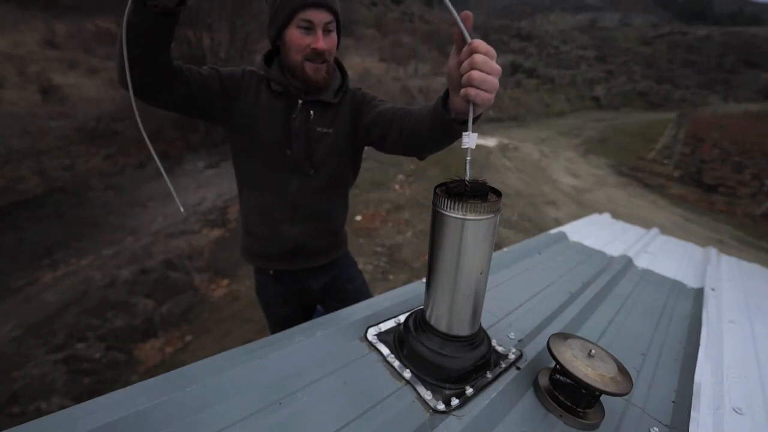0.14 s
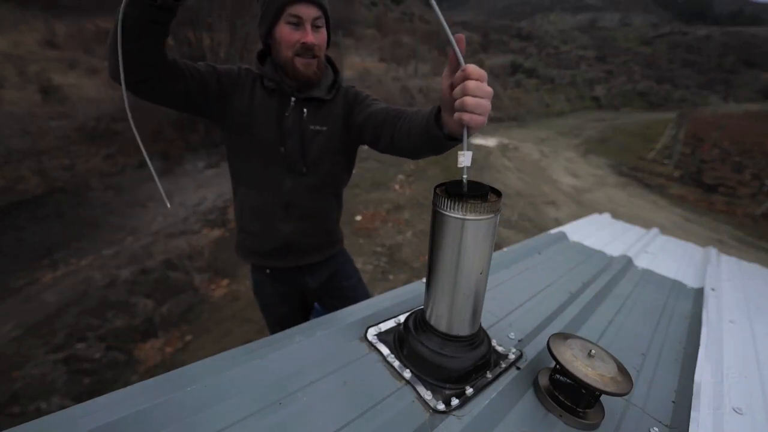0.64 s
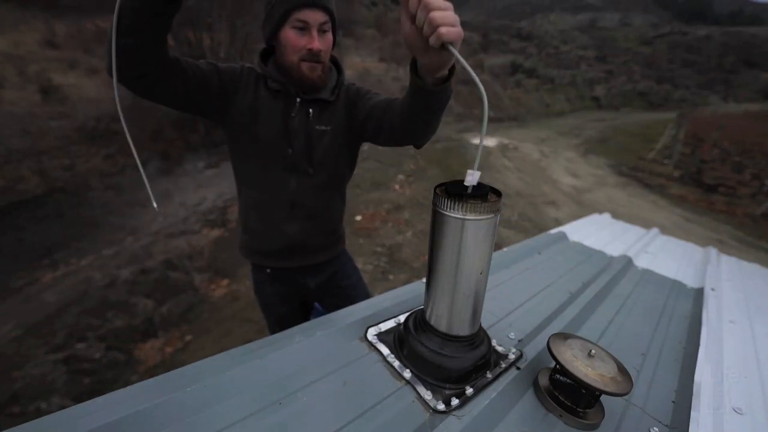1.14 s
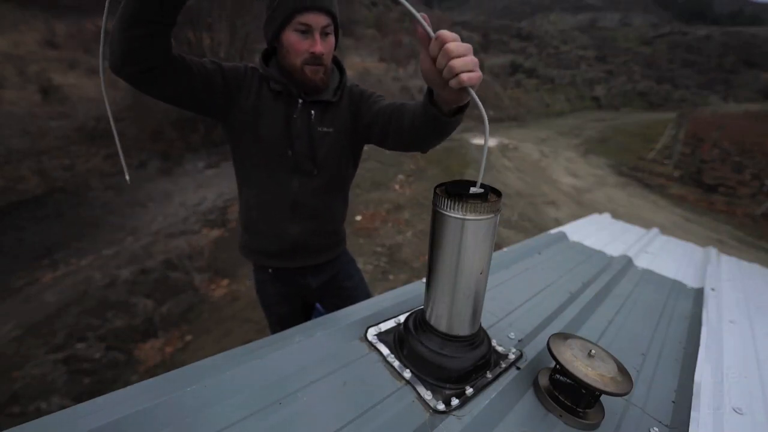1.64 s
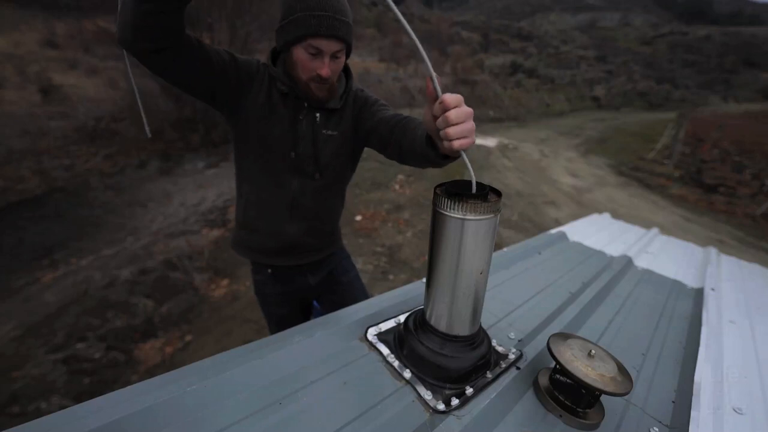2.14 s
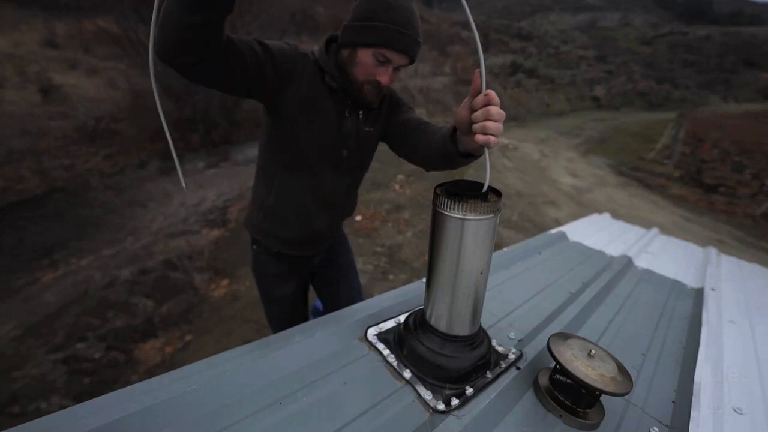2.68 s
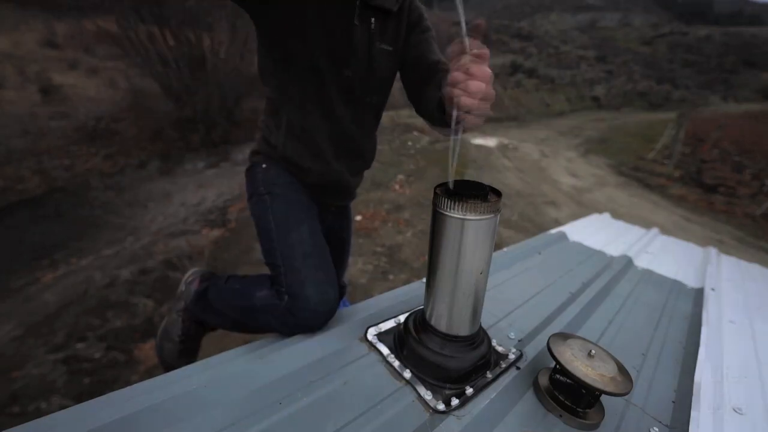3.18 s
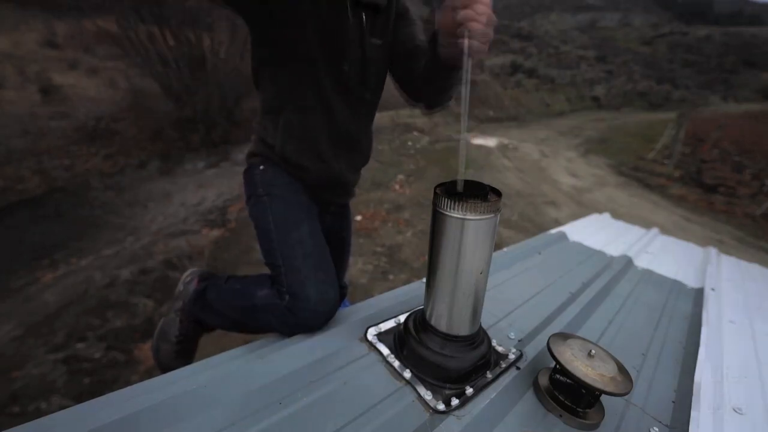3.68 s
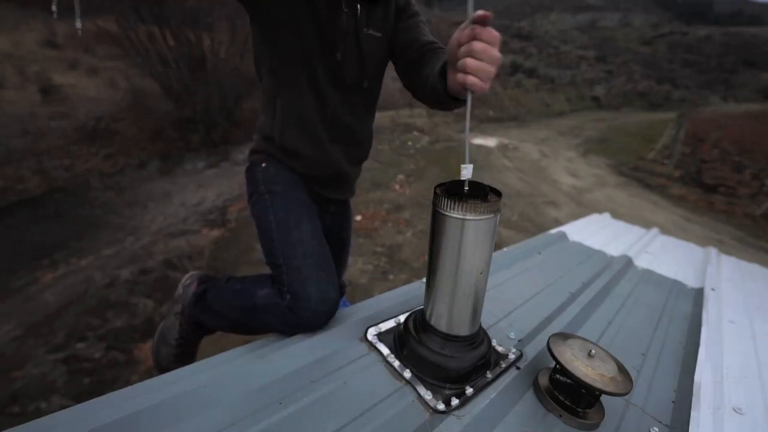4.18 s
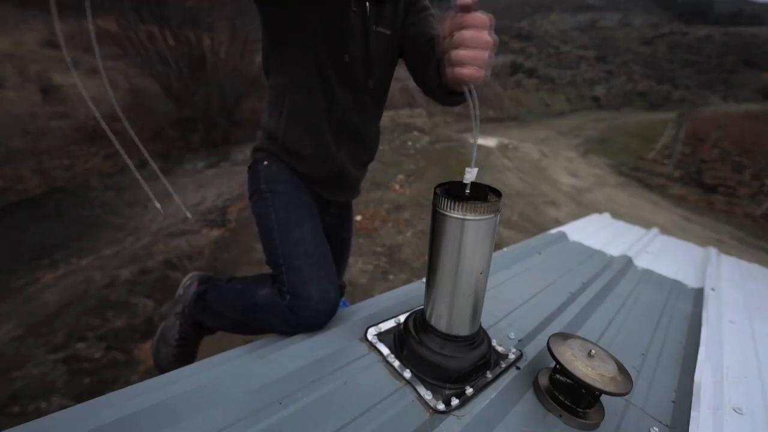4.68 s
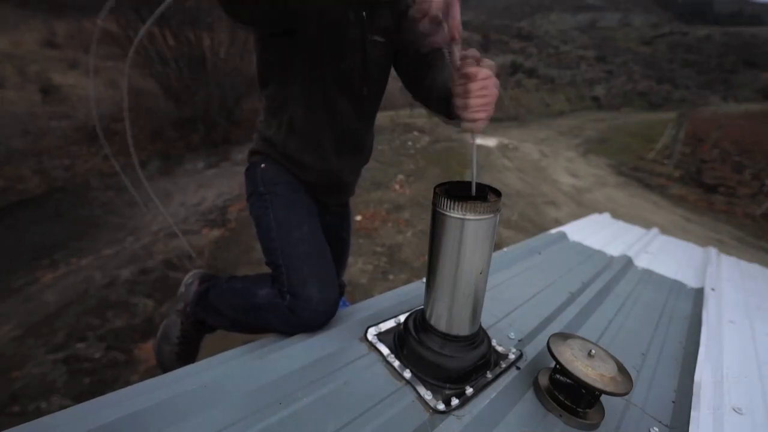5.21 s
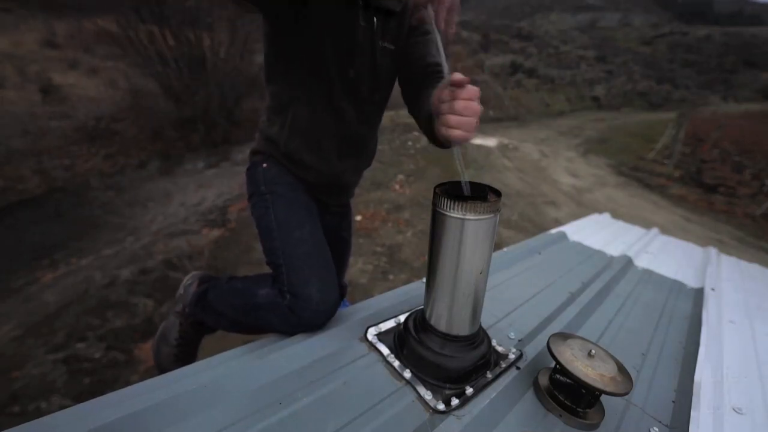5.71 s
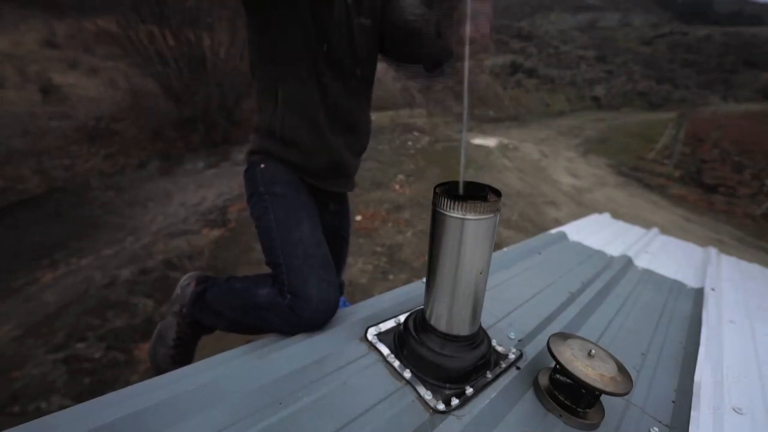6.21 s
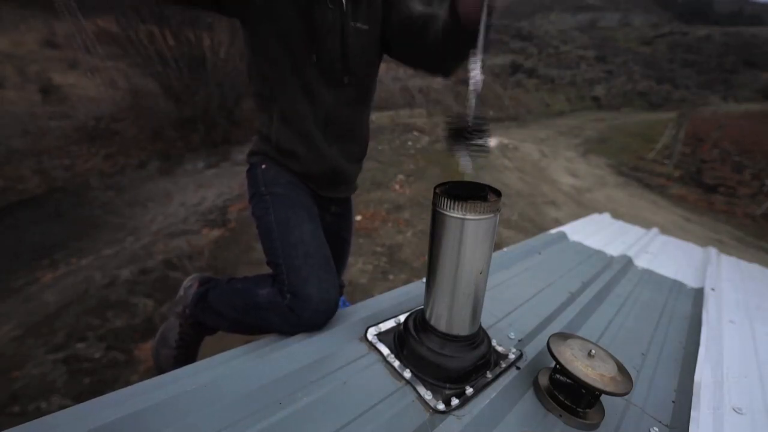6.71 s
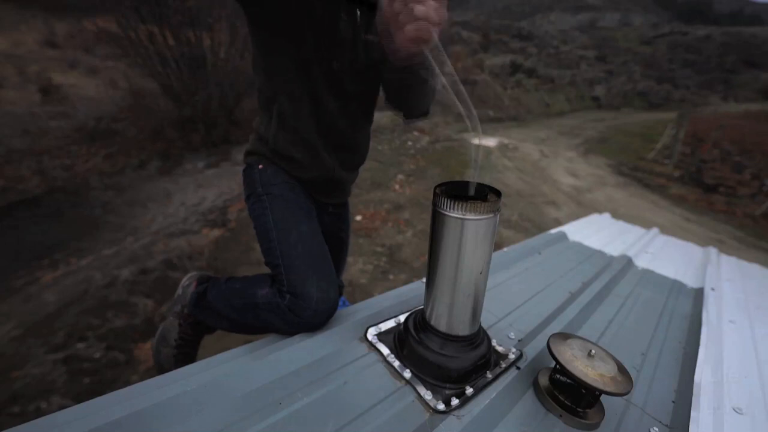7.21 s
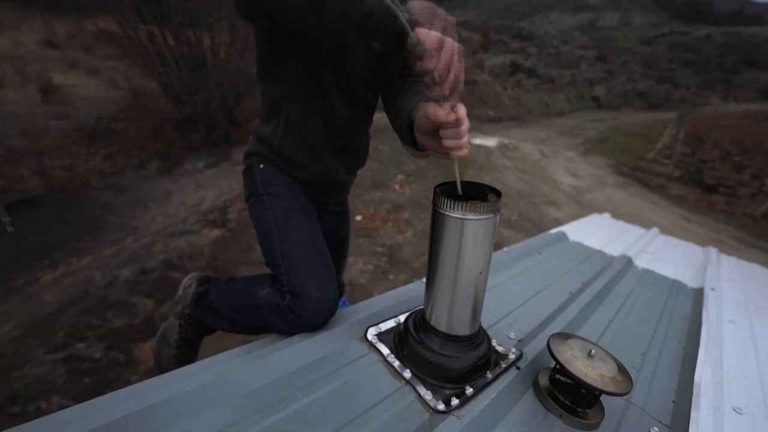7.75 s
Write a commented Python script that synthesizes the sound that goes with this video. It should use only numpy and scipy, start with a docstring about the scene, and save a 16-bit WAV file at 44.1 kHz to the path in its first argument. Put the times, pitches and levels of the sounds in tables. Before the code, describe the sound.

Raspy metallic brush strokes rasp in a hollow sheet-metal flue, broken by sharp clinks and creaky roof knocks, with faint wind outdoors.

```python
"""A wire brush on a flexible rod scrubs up and down in a sheet-metal stove pipe on a steel roof, near one microphone.
Stick-slip of the bristles makes dense tiny clicks that hiss out of the pipe mouth and ring the wall as resonances.
The rod and bristles tick on the rim, each tick a crack of noise with a short ping of close tones.
A knee knocks, creaks and squeaks on the roof sheet, as noise through resonances; a smooth rustle swells once.
Low coloured noise is wind buffeting the microphone, over a far outdoor noise."""
import sys
import numpy as np
from scipy import signal
from scipy.fft import rfft, irfft, next_fast_len
from scipy.io import wavfile
from scipy.ndimage import uniform_filter1d, map_coordinates

SR = 44100
rng = np.random.default_rng(int(sys.argv[2]) if len(sys.argv) > 2 else 0)


def unload_wav(signal):
    """Save mono or channel-first audio to the path in sys.argv[1] as 16-bit WAV at rate SR, clipped to [-1, 1]."""
    wavfile.write(
        sys.argv[1],
        SR,
        np.round(np.clip(np.atleast_2d(signal).T, -1, 1) * 32767).astype(np.int16),
    )


def volts(x):
    """Linear amplitude factor 10**(x/20) for a level x in dB, scalar or array-like."""
    e = np.asarray(x, float) / 20
    return 10 ** e


N = 346626  # length [samples]

# wind on the microphone: (time [s], buffet level [dB])
WIND_LEVEL = [(0.0, -44.5), (0.85, -35), (0.9, -43.5), (3.83, -49), (3.92, -26.5), (4.12, -40), (6.04, -41),
              (6.08, -27), (6.6, -49.5), (6.63, -33), (6.89, -36), (6.98, -47), (7.07, -35), (7.46, -26.5),
              (7.53, -31), (7.6, -19.5), (7.86, -46)]
# spectrum of the buffet: (frequency [Hz], relative level per hertz [dB])
BUFFET_COLOUR = [(15, -7), (33, 0), (43, 0.5), (60, -20), (110, -41), (200, -71)]
# spectrum of the far outdoor noise: (frequency [Hz], relative level per hertz [dB])
FAR_COLOUR = [(40, -33), (75, 7.5), (130, -10), (300, -14), (900, -12), (1700, -16), (2600, -28),
              (8600, -35), (9600, -37), (15600, -47)]
FAR_DB = -51.5  # rms level of the far noise

# a soft, smooth rustle, perhaps a sleeve: (time [s], level [dB])
RUSTLE_LEVEL = [(3.25, -58), (3.3, -48.5), (3.85, -73.5)]

# knee knocks on the roof sheet: (time [s], crack strength [dB], thud strength [dB])
KNEE_KNOCKS = [(3.602, -43, -61), (3.672, -31.5, -48), (3.769, -33, -49), (3.856, -19.5, -38),
               (3.867, -21, -38), (3.898, -18.5, -42), (3.964, -33, -43.5), (4.111, -28.5, -50),
               (4.172, -24, -68), (4.208, -20.5, -50)]
# roof sheet resonances: (frequency [Hz], width [Hz], relative level [dB])
ROOF_MODES = [(132, 41, 10.5), (466, 77, 2), (790, 220, -3), (1106, 320, -4), (1780, 320, -3.5),
              (3140, 1400, -11)]
# creaking of the roof sheet under the shifting knee: (time [s], strength [dB])
CREAK_STRENGTH = [(3.66, -51), (3.69, -46.5), (3.76, -54), (3.86, -38), (4.0, -46), (4.22, -43), (4.3, -55)]
# one squeak of the roof sheet: (start [s], end [s], frequency [Hz], resonance width [Hz], highest level [dB])
ROOF_SQUEAK = (3.775, 3.853, 1880, 170, -39)

# rod and bristle ticks on the rim: (time [s], strength [dB], ping frequency [Hz])
RIM_TICKS = [(1.546, -48.5, 3150), (2.4337, -49, 4840), (2.7492, -34, 1630), (3.174, -36.5, 5060),
             (3.537, -32.5, 4950), (3.538, -44, 1670), (5.7258, -31, 8600), (5.7948, -10, 7850),
             (6.0205, -25, 7200), (6.2982, -9, 7320), (6.7647, -9.5, 8300), (7.0468, -29.5, 2930),
             (7.1987, -14.5, 7830), (7.203, -24.5, 561)]

# full brush strokes, all equally loud: (full from [s], held [s], rise [s per 40 dB], fall [s per 40 dB],
# spring-back level [dB])
FULL_STROKES = [(0.164, 0.035, 0.122, 0.09, -56), (0.35, 0.045, 0.14, 0.063, -48),
                (0.656, 0.097, 0.045, 0.054, -46), (1.192, 0.073, 0.06, 0.045, -48),
                (1.783, 0.121, 0.131, 0.088, -43), (2.097, 0.098, 0.04, 0.059, -44),
                (4.595, 0.093, 0.08, 0.057, -41), (4.853, 0.118, 0.035, 0.053, -42),
                (5.329, 0.121, 0.02, 0.077, -56), (5.794, 0.143, 0.025, 0.131, -42),
                (6.298, 0.21, 0.018, 0.13, -56), (6.766, 0.089, 0.004, 0.073, -52),
                (7.495, 0.095, 0.008, 0.045, -70), (7.77, 0.1, 0.08, 0.1, -70)]
FULL_DB = -14.5  # scrape level of every full stroke
# bristles spring back after a stroke: delay and hold [s], rise and fall [s per 40 dB]
SPRING_S, SPRING_HELD_S, SPRING_RISE_S, SPRING_FALL_S = 0.094, 0.013, 0.055, 0.081
# the bristles catch on the wall abruptly: (full from [s], held [s], level [dB])
WALL_CATCHES = [(0.001, 0.017, -28), (0.058, 0.027, -34.5), (0.556, 0.039, -40), (1.152, 0.17, -23.5),
                (1.314, 0.027, -42.5), (1.702, 0.018, -25), (2.454, 0.0092, -54.5), (2.736, 0.012, -33),
                (2.799, 0.008, -38.5), (3.023, 0.052, -45.5), (3.116, 0.0085, -50.5), (3.966, 0.0044, -55),
                (4.029, 0.036, -42), (4.112, 0.0044, -51.5), (4.429, 0.041, -31.5), (4.551, 0.045, -21.5),
                (6.264, 0.033, -36.5), (6.562, 0.012, -24), (6.744, 0.021, -39.5), (6.972, 0.0051, -25.5),
                (7.201, 0.013, -26), (7.283, 0.017, -36.5), (7.334, 0.011, -15), (7.384, 0.022, -18),
                (7.419, 0.037, -29), (7.4607, 0.005, -19.5), (7.713, 0.05, -22.5)]
CATCH_RISE_S, CATCH_FALL_S = 0.008, 0.05  # [s per 40 dB]
# light drags that swell and fade: (full from [s], held [s], level [dB], fall [s per 40 dB])
LIGHT_DRAGS = [(0.493, 0.01, -37, .15), (1.07, 0.03, -55, .06), (1.418, 0.031, -29, .06),
               (1.685, 0.01, -43, .05), (2.025, 0.003, -40, .08), (2.89, 0.032, -21, .07),
               (4.007, 0.003, -43, .04), (4.155, 0.003, -36, .27), (4.374, 0.03, -37, .08),
               (5.17, 0.03, -49, .13), (5.26, 0.05, -45, .1), (5.6, 0.1, -54, .1), (6.14, 0.08, -53, .06),
               (7.123, .01, -46, .1), (6.68, 0.03, -53, .05), (7.039, 0.009, -34, .05),
               (7.36, 0.02, -26, .06)]
DRAG_RISE_S = 0.12  # [s per 40 dB]
RESTING_DB, STIR_DB = -70, 4  # scrape level between contacts, and the size of its random stirring

# spectrum of the bristle hiss leaving the pipe mouth: (frequency [Hz], relative level per hertz [dB])
MOUTH_COLOUR = [(1500, -21), (3300, -15), (4300, -11.5), (5000, -6), (6100, -9), (7100, -2), (8600, -3),
                (10300, -14), (12800, -5.5), (14500, -14), (15600, -15)]
# pipe wall modes: (frequency [Hz], width and splitting [Hz], relative level [dB])
WALL_MODES = [(260, 38.7, -4), (401.7, 8.1, -7), (534, 9, 4.5), (677.4, 20.6, -4.5), (790.6, 12.6, -0.5),
              (1085, 18.4, 1), (1229, 25, -4.5), (2720, 9, 0.5), (2793, 14.7, 2), (2906, 16, -1.5),
              (2938, 13.3, -3), (3016, 15, -1.5), (4780, 40, -2)]
# broad drone of the pipe between its modes: (frequency [Hz], relative level per hertz [dB])
DRONE_COLOUR = [(80, -12), (140, -3), (300, 2), (420, -8.5), (1200, -4.5), (2300, -7.5), (4500, -21)]
# coupling of the strokes to wall and drone as the brush changes depth: (time [s], relative level [dB])
DEPTH_COUPLING = [(0, -20), (1.3, -24), (2.9, -20), (4.4, -22), (5.9, -23), (7.9, -23.5)]

TOP_HZ = 15750  # upper band limit


def unit(x):
    """Normalisation: scales a signal to rms 1."""
    return x / np.sqrt(np.mean(x ** 2) + 1e-20)


def filtered(x, response):
    """Convolution theorem: multiplies the spectrum of x by a response of frequency."""
    m = next_fast_len(N + SR // 2)
    return irfft(rfft(x, m) * response(np.fft.rfftfreq(m, 1 / SR)), m)[..., :N]


def colour(points):
    """Spectral shaping: a gain interpolated in dB over log frequency."""
    f, level = np.transpose(points)
    return lambda hz: volts(np.interp(np.log(hz + 1), np.log(f), level))


def modes(table):
    """Modal superposition: a sum of damped resonances of alternating sign."""
    def response(f):
        total = 0
        for k, (centre, width, db) in enumerate(table):
            resonance = 1j * f * width / (centre * centre - f * f + 1j * f * width)
            total = total + (-1) ** k * volts(db) * resonance
        return total
    return response


def curve(rows):
    """Amplitude envelope: a gain linear in dB between (time, level) rows, -120 dB outside them."""
    s, db = np.transpose(rows)
    return volts(np.interp(np.arange(N) / SR, s, db, left=-120, right=-120))


def wobble(rate):
    """Band-limited fluctuation: a smooth random curve through rate knots a second."""
    knots = rng.standard_normal(int(N * rate / SR) + 4)
    return map_coordinates(knots, [np.arange(N) * rate / SR])


def slips(rate, spread_db):
    """Stick-slip friction: random clicks, rate a second, a few larger than the rest, at rms 1."""
    happens = rng.random(N) < rate / SR
    size = volts(spread_db * rng.exponential(size=N))
    return unit(happens * rng.standard_normal(N) * size)


def bursts(times, levels_db, t60):
    """Impact with exponential decay: noise starts sharply and falls 60 dB in t60 seconds."""
    out, t = np.zeros(N + SR), np.arange(SR // 4) / SR
    for s, db in zip(times, levels_db):
        out[round(s * SR):][:len(t)] += volts(db - 60 * t / t60) * rng.standard_normal(len(t))
    return out[:N]


def air():
    """Turbulent pressure: low coloured noise buffets the microphone, over a gently swelling far noise."""
    buffet = unit(filtered(rng.standard_normal(N), colour(BUFFET_COLOUR)))
    far = unit(volts(1.5 * wobble(5)) * filtered(rng.standard_normal(N), colour(FAR_COLOUR)))
    return curve(WIND_LEVEL) * buffet + volts(FAR_DB) * far


def rustle():
    """Broadband friction: a smooth bright hiss swells and fades once."""
    bright = colour([(1500, -2.5), (4000, -6.5), (8600, -5.5), (9600, -12), (15600, -20)])
    return curve(RUSTLE_LEVEL) * unit(filtered(rng.standard_normal(N), bright))


def knee():
    """Forced plate vibration: knocks crack and softly boom, rough slips creak and one resonance squeaks."""
    s, db, thud_db = np.transpose(KNEE_KNOCKS)
    creak = curve(CREAK_STRENGTH) * slips(5000, spread_db=2.0)
    sharp_force = volts(12) * bursts(s, db, t60=0.037) + volts(16.5) * creak
    upper_roof = modes(ROOF_MODES[1:])
    crack = filtered(sharp_force, lambda f: upper_roof(f) / (1 + 1j * f / 5000))  # softened above 5 kHz
    boom = filtered(volts(25.5) * bursts(s, thud_db, t60=0.09), modes(ROOF_MODES[:2]))
    start, end, hz, width, squeak_db = ROOF_SQUEAK
    resonance = modes([(hz, width, 0)])
    squeak = unit(filtered(rng.standard_normal(N), lambda f: resonance(f) ** 2))
    swell = curve([(start, squeak_db - 5), (end - 0.02, squeak_db), (end, squeak_db - 4)])
    return crack + boom + swell * squeak


def ticks():
    """Impulsive excitation: a crack of noise, and a beating, quickly decaying ping of eight close tones."""
    s, db, hz = np.transpose(RIM_TICKS)
    pings, t = np.zeros(N + SR), np.arange(SR // 8) / SR
    detunings = rng.normal(1, 0.04, (len(s), 8, 1))
    for start, level_db, pitch_hz, detune in zip(s, db, hz, detunings):
        t60 = 0.035 + 70 / pitch_hz  # low pings last longer
        decay = volts(0.81 * level_db - 23 - 60 * t / t60)
        tones = np.sin(2 * np.pi * pitch_hz * detune * t).sum(0)
        pings[round(start * SR):][:len(t)] += decay * tones
    return bursts(s, 0.95 * db, t60=0.026), pings[:N]


def contact(s, held, db, rise, fall):
    """Energy addition: summed power of contacts that rise, hold and fall, one value every 16 samples."""
    s, held, db, rise, fall = (np.reshape(v, (-1, 1)) for v in (s, held, db, rise, fall))
    t = np.arange(0, N, 16) / SR
    before = np.maximum((s - t) / np.abs(rise), 0)
    after = np.maximum((t - s - held) / np.abs(fall), 0)
    return np.sum(volts(db - 40 * (before + after)) ** 2, axis=0)


def stroke_db():
    """Incoherent addition: strokes, spring-back, catches and drags add in power to a scrape level [dB]."""
    s, held, rise, fall, spring_db = np.transpose(FULL_STROKES)
    drag_s, drag_held, drag_db, drag_fall = np.transpose(LIGHT_DRAGS)
    spring_s = s + held + SPRING_S
    power = contact(s, held, FULL_DB, rise, fall)
    power += contact(spring_s, SPRING_HELD_S, spring_db, SPRING_RISE_S, SPRING_FALL_S)
    power += contact(*np.transpose(WALL_CATCHES), CATCH_RISE_S, CATCH_FALL_S)
    power += contact(drag_s, drag_held, drag_db, DRAG_RISE_S, drag_fall)
    resting = volts(RESTING_DB + STIR_DB * wobble(11)) ** 2
    return 10 * np.log10(np.interp(np.arange(N), np.arange(0, N, 16), power) + resting)


def lingering(x, t60):
    """Reverberant decay: a level follows x upward at once, sinking no faster than the pipe air dies away."""
    fall = 60 * np.arange(N) / SR / t60
    return np.maximum.accumulate(x + fall) - fall


def patchy(x, depth_db):
    """Modal colouring: many faint wall modes streak the hiss at random, some 170 Hz by 60 ms each."""
    z = signal.stft(x, nperseg=512)[2]
    across_hz = uniform_filter1d(rng.standard_normal(z.shape), size=2, axis=0)
    field = uniform_filter1d(across_hz, size=10, axis=1)
    return unit(signal.istft(z * volts(depth_db * unit(field)), nperseg=512)[1][:N])


def wall_ring(force):
    """Mode splitting: each wall mode rings as two close halves with independently varying drive."""
    ring = 0
    for k, (hz, width, db) in enumerate(WALL_MODES):
        for half in (-0.5, 0.5):
            # the moving brush presses on ever new spots, so the halves are fed unevenly
            drive = volts(4.5 * wobble(7.6)) * force
            ring = ring + (-1) ** k * filtered(drive, modes([(hz + half * width, width, db)]))
    return ring


def brush():
    """Friction-driven resonance: slips and ticks hiss from the mouth; a softened force rings the wall."""
    mouth, pipe = colour(MOUTH_COLOUR), colour(DRONE_COLOUR)
    level_db = stroke_db()
    lightness = np.clip((-20.5 - level_db) / 25, 0, 1)  # a light touch engages few bristles and flutters more
    flutter = volts((0.7 + 4 * lightness) * wobble(110) + 0.5 * wobble(300))
    hiss = patchy(filtered(slips(20000, spread_db=1), mouth), depth_db=2.4)
    crackle = lightness * unit(filtered(slips(400, spread_db=1), mouth))  # single bristles snap free
    scrape = volts(level_db) * flutter * (hiss + volts(-19.5) * crackle)

    crack, pings = ticks()
    coupling = curve(DEPTH_COUPLING)
    push = volts(0.83 * level_db) * flutter  # the wall answers less steeply than the hiss
    force = volts(19) * coupling * push * slips(20000, spread_db=1) + volts(5.0) * crack
    ring = wall_ring(force)
    drone_level = coupling * volts(0.8 * lingering(level_db, t60=0.22))
    drone = drone_level * unit(filtered(slips(6000, spread_db=1), pipe))
    thump = volts(0.5) * filtered(crack, pipe)  # a tick also knocks the hollow pipe
    return scrape + ring + drone + thump + filtered(crack, mouth) + pings


def scene():
    """Linear superposition: all sources add at one microphone, which feeds both channels."""
    return np.tile(air() + rustle() + knee() + brush(), (2, 1))


def band_limit(x):
    """A steep low-pass at the top of the band."""
    return signal.sosfilt(signal.butter(12, 16960, fs=SR, output="sos"), x)


def record(dry):
    """Saturation and band limiting: the input stage rounds off the highest peaks, then the top is cut."""
    rounded = dry / (1 + np.abs(dry / 0.95) ** 4) ** (1 / 4)
    mix = filtered(rounded, lambda hz: hz < TOP_HZ)
    return band_limit(mix)


dry = scene()
out = record(dry)
unload_wav(out)
```